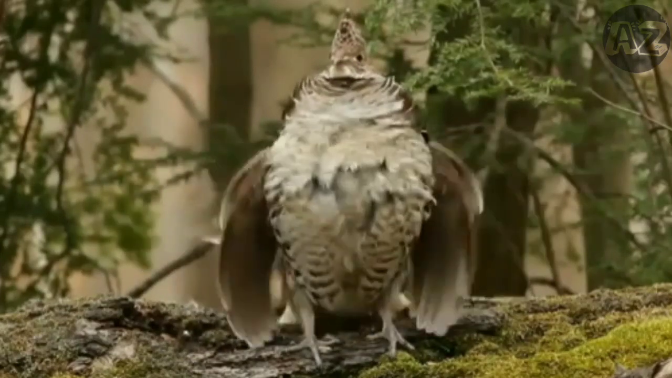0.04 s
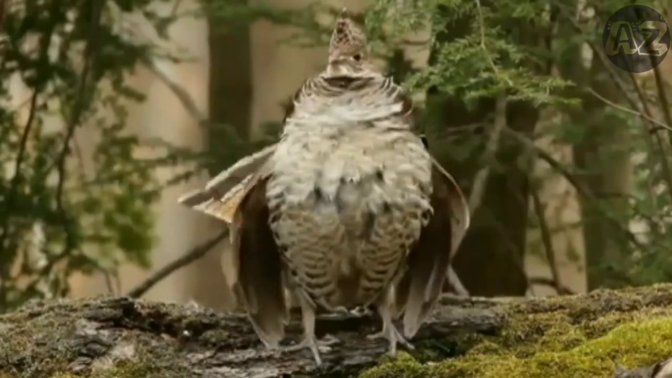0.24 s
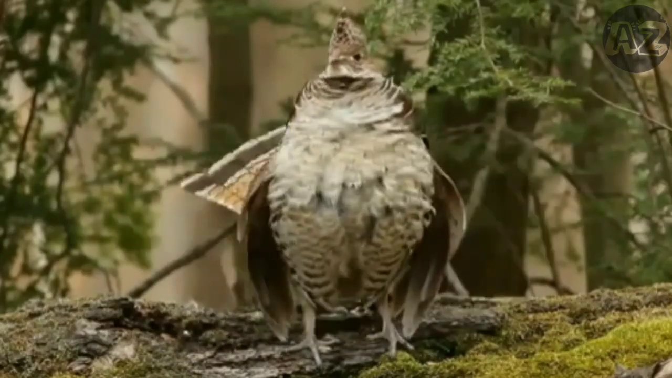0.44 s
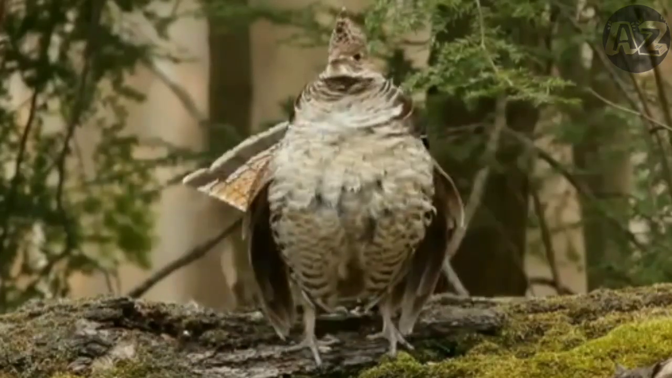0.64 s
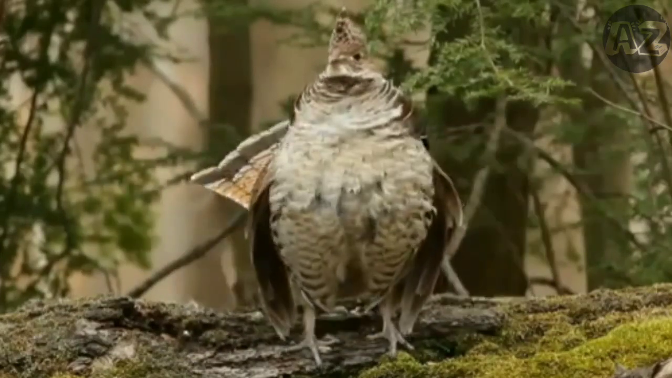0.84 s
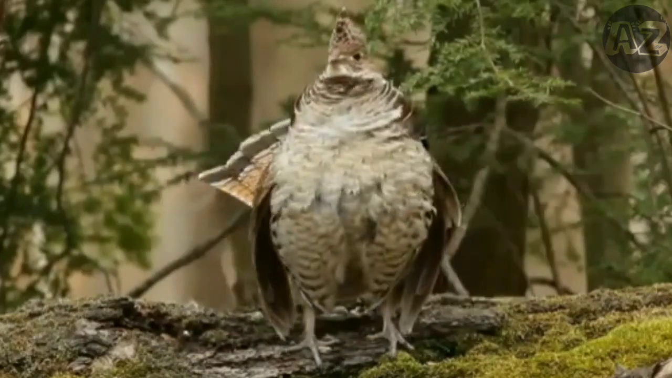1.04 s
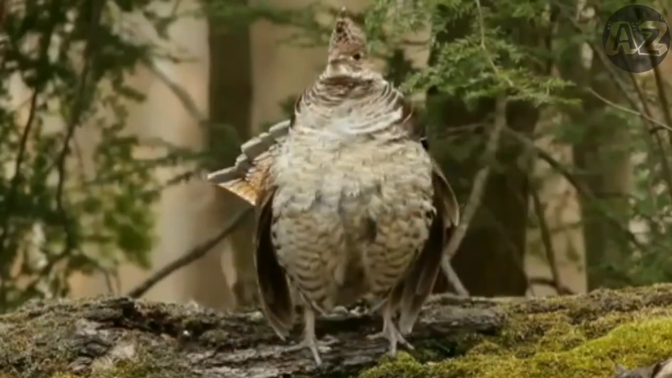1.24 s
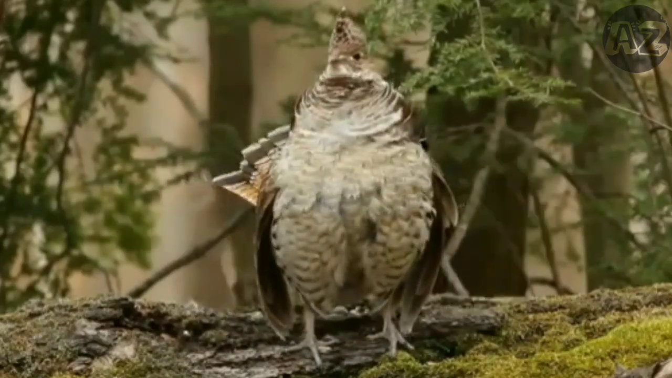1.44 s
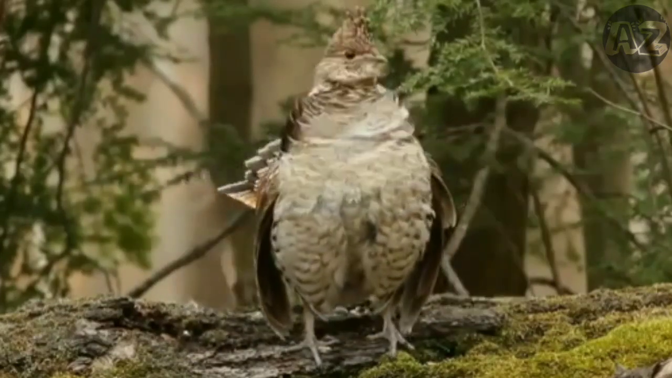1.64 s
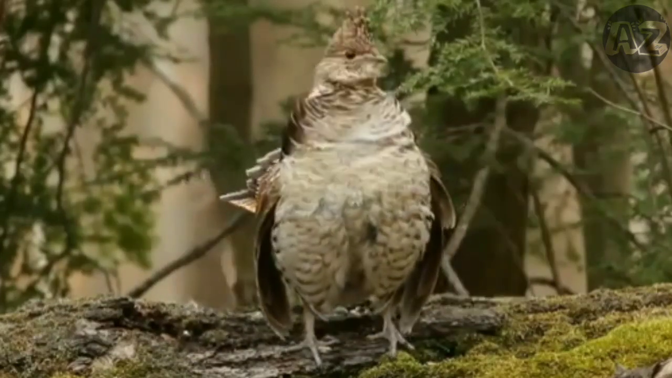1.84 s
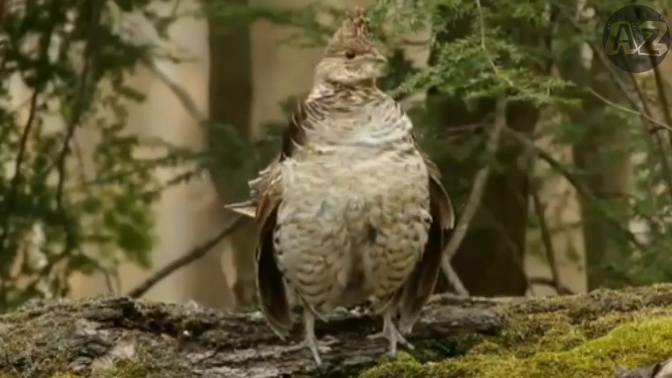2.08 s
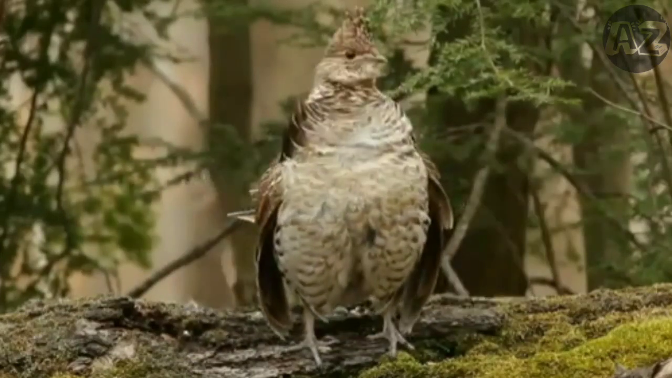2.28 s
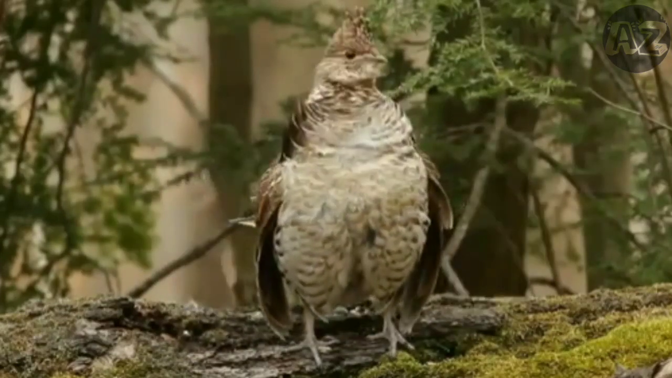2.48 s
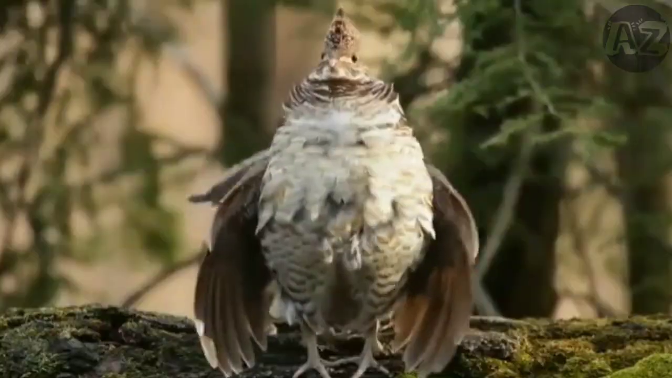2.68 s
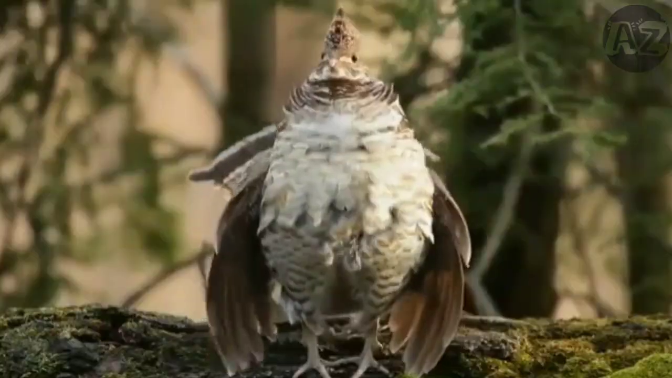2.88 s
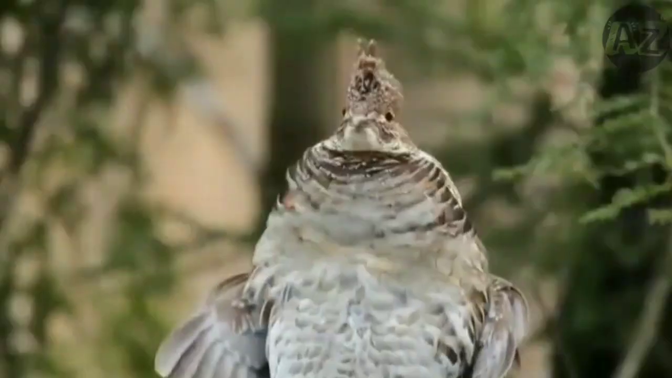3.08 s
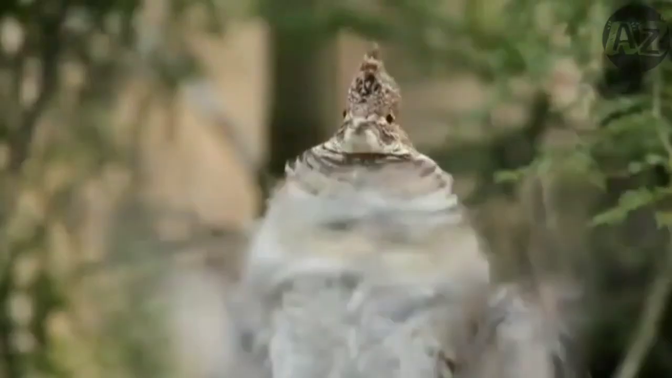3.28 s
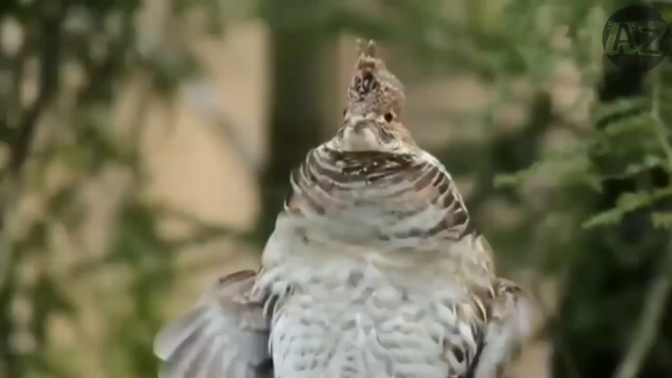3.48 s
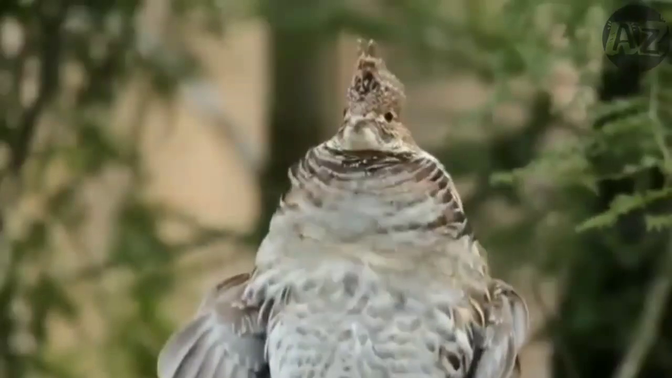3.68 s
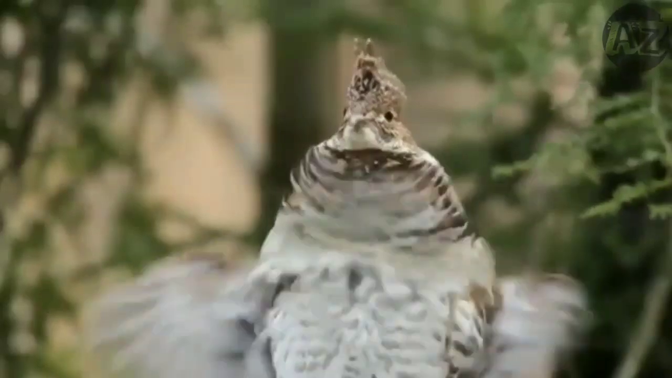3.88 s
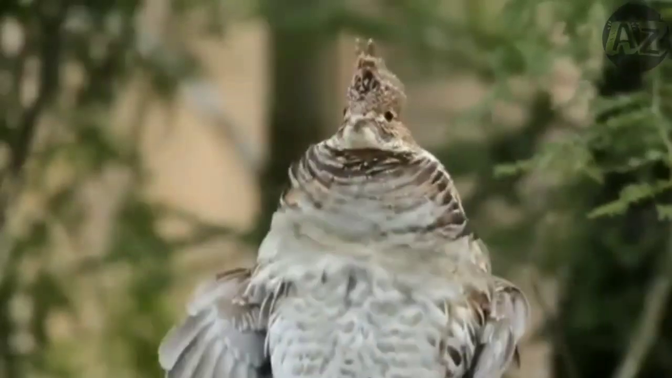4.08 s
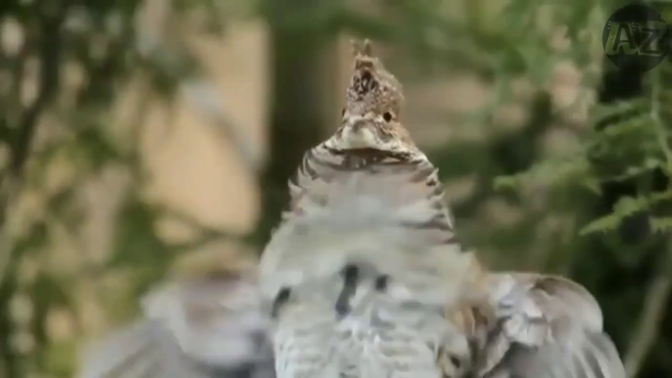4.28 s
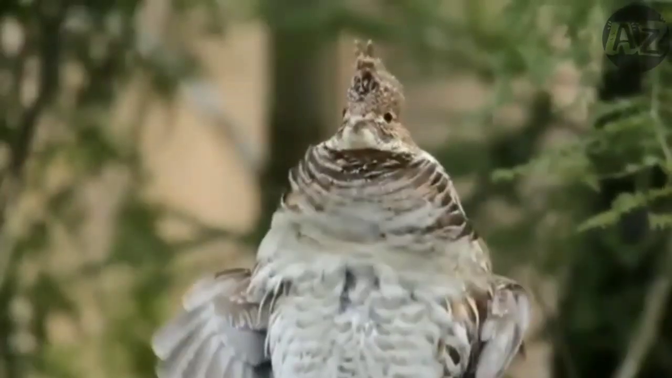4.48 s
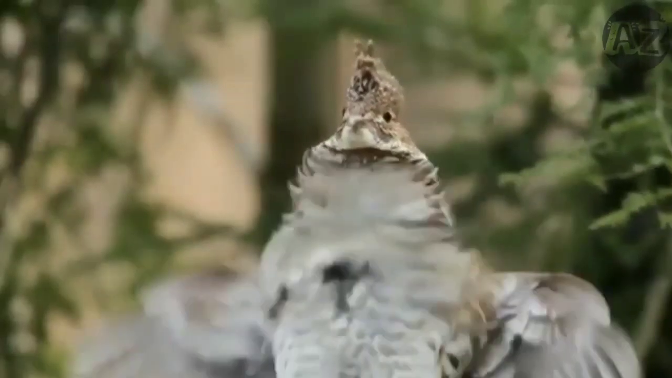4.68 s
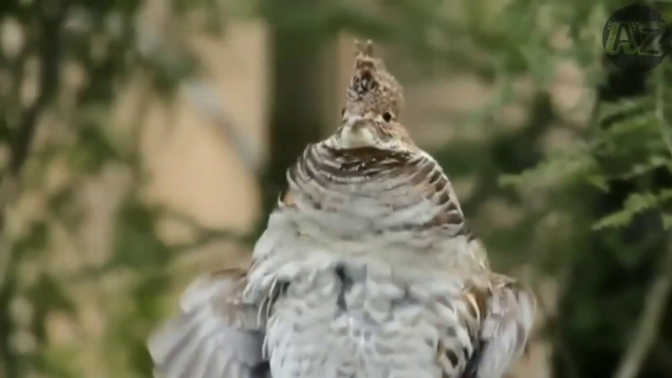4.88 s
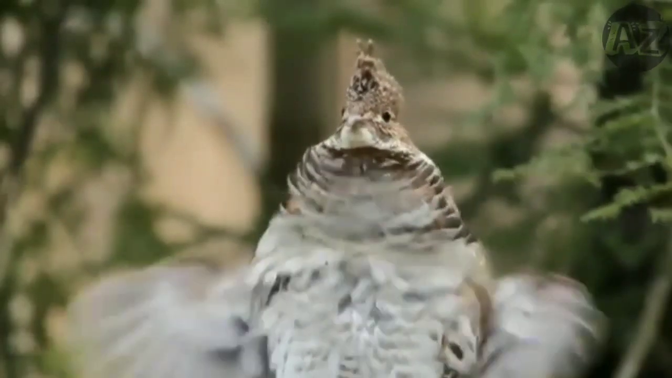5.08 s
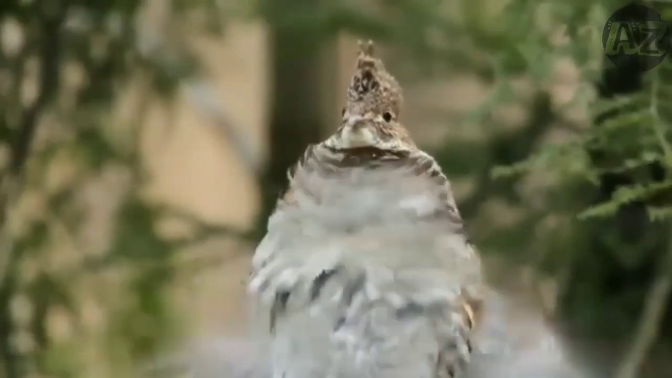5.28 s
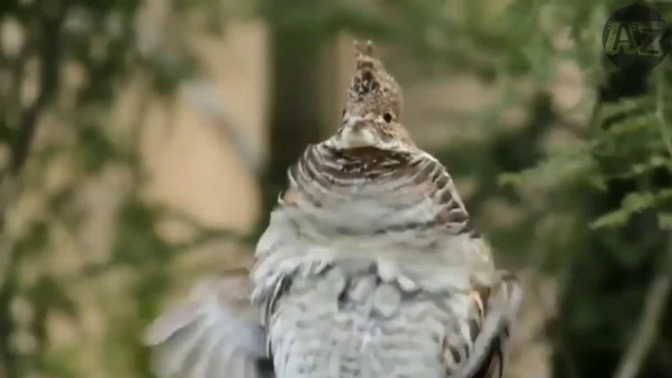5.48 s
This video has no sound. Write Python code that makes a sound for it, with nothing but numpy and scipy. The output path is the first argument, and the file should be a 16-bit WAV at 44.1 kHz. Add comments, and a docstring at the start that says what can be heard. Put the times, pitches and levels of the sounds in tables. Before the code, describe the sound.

Close stereo microphones in a damp forest. One very deep wing thump opens, then over three seconds of quiet: rapid high insect chirps, soft drips, leaf ticks and a thin far bird whistle. A rumbling gust arrives just before three seconds, with a faint burry bird note. Then six heavy thumps follow, closer and closer, overloading slightly and rolling away among the trees.

```python
"""A ruffed grouse starts to drum on a log, close to a pair of microphones in a damp forest. Each wing stroke is
one deep pressure pulse that rolls away among the trees; loud peaks overload the recorder. An insect chirps very
high in runs of falling whistles, and fainter insects shimmer behind it. Water drips on leaves and litter as
short noise bursts; a far bird's two calls are noise rung at a pitch. Shaped noise makes the forest hush, the
soft rumble of moving air and a wide hiss that swells and then drops away."""
import sys
import numpy as np
from scipy import signal
from scipy.fft import rfft, irfft, next_fast_len
from scipy.io import wavfile
from scipy.ndimage import uniform_filter1d

SR = 44100
rng = np.random.default_rng(int(sys.argv[2]) if len(sys.argv) > 2 else 0)


def pcm_store(signal):
    """Save signal as 16-bit PCM."""
    levels = np.round(np.clip(np.atleast_2d(signal), -1, 1) * 32767)
    wavfile.write(sys.argv[1], SR, levels.astype(np.int16).T)


N = 243873
TIME = np.arange(N) / SR

# wing strokes: (time [s], pulse peak [dB], build-up width [s], opening flick relative to the pulse [dB])
WING_STROKES = [(0.0853, -0.5, .005, -40), (3.4389, 3.4, .0101, -8.5), (3.9532, 3.7, .0058, -27),
                (4.4048, 3.6, .0057, -21), (4.8064, 3.4, .0056, -21), (5.1755, 3.6, .0056, -20),
                (5.5128, 3.6, .0053, -27)]
# the loudest drips on the litter: (time [s], peak before the shared drip level is added [dB], pitch [Hz])
LITTER_DRIPS = [(0.404, -32, 1110), (0.466, -34.5, 907), (0.925, -31.5, 1690), (1.02, -34, 1570),
                (1.156, -31, 1460), (1.316, -33.5, 410), (1.682, -30.5, 474), (1.777, -32.5, 2670),
                (1.99, -32.5, 370), (2.317, -32.5, 1160), (2.388, -29.5, 1170), (2.488, -30.5, 482),
                (2.598, -33, 365), (3.731, -30.5, 2340), (4.547, -31, 1510), (4.638, -31, 1530),
                (5.145, -31, 1850), (5.34, -30, 1100)]
# the sharpest ticks of droplets on near leaves: (time [s], peak [dB], centre pitch [Hz])
LEAF_TICKS = [(0.181, -28.5, 9000), (0.68, -32, 7500), (0.776, -26, 6530), (0.997, -27.5, 5260),
              (1.32, -24.5, 7100), (1.553, -27, 8500), (2.358, -33, 5000), (3.173, -22.5, 7600),
              (3.453, -24, 8900), (3.571, -25, 6300), (4.583, -28, 7530), (5.032, -28, 8000),
              (5.381, -29.5, 6230)]
# far bird: (start [s], end [s], pitch [Hz], half the width of each filter [Hz], level at full swell [dB])
BIRD_CALLS = [(0.077, 0.62, 2630, 20, -53.5), (0.089, 0.6, 3600, 30, -61), (2.68, 3.51, 2724, 160, -49)]
# air moving over the microphones, a lull and then a gust: (time [s], level [dB])
BREEZE_LEVEL = [(0, -25), (.2, -30.5), (.7, -35), (1.5, -44.5), (2.1, -52.5), (2.66, -50), (2.85, -18.5),
                (3.05, -24), (3.3, -19), (3.5, -31), (5.53, -31)]
# a wide soft hiss that grows and then drops away at 3.5 s: (time [s], level [dB])
WIDE_HISS_LEVEL = [(0, -62), (1.4, -58.5), (2.6, -56.5), (2.85, -52.5), (3.38, -50), (3.52, -61)]
# tone balance of the moving air: (frequency [Hz], relative level per Hz [dB])
BREEZE_SPECTRUM = [(12, 3.5), (20, 1.5), (32, -18), (45, -24.5), (65, -17.5), (100, -28), (160, -41.5),
                   (300, -55.5), (1000, -76.5)]
# tone balance of the wide hiss: (frequency [Hz], relative level per Hz [dB])
WIDE_HISS_SPECTRUM = [(100, 10), (400, 4), (1000, 3.5), (2000, -7), (4000, -32), (12000, -24)]
# tone balance of the forest hush: (frequency [Hz], relative level per Hz [dB])
FOREST_SPECTRUM = [(30, 4), (100, 6.5), (240, -11.5), (450, -7.5), (700, -8), (950, -6.5), (2300, -7.5),
                   (3700, -12), (4700, -17), (5300, -10), (7200, -8.5), (10000, -13.5), (15500, -31)]
# how alike left and right are in the forest hush: (frequency [Hz], likeness [-1 to 1])
FOREST_ALIKE = [(30, 0.27), (200, 0.49), (500, 1), (2000, 0.97), (5000, 1), (15000, 1)]
# balance of the far drops' bands: (frequency [Hz], relative level of the band [dB])
PATTER_BALANCE = [(300, -3), (450, 0.5), (680, -11), (880, 0), (1600, -3), (2600, 0), (3600, -6.5),
                  (4700, 2), (5500, -1.5), (7200, 5.5), (10000, -0.5), (14000, -11.5)]
# tone balance of the trees' echo: (frequency [Hz], relative level per Hz [dB])
ECHO_SPECTRUM = [(12, 16.5), (25, 3), (38, -2), (55, -9), (85, -5.5), (110, 4), (160, -38), (300, -22),
                 (1000, -28)]
# the insect's pace, slower by the end: (time [s], time from chirp to chirp [s])
CHIRP_PACE = [(0, .1524), (.7, .1496), (1, .152), (3.25, .1529), (3.5, .1592), (4.4, .1543), (4.6, .166)]

# a harder stroke is a quicker one: pitch at 0 dB, its rise with strength, and the width of its fall
STROKE_HZ, STROKE_HZ_PER_DB, STROKE_FALL_S = 53.6, 1.15, .0084
FLICK_LEAD_S, FLICK_WIDTH_S = .0175, .002
RIGHT_LEAD_S, RIGHT_DB = .0005, -.4
BOOM_HZ, BOOM_WIDTH_HZ, BOOM_DB = 40, 23, -13
# the song starts just before the sound does; each chirp fills this share of its period
SONG_START_S, SONG_END_S, CHIRP_SHARE = -.07, 5.3, .745
# softer drips: peak before the shared drip level is added, and range of pitch
SOFT_DRIP_DB, SOFT_DRIP_LOW_HZ, SOFT_DRIP_HIGH_HZ = -38, 365, 1940
CUTOFF_HZ = 15600


def from_db(db):
    """Turn decibels into a gain."""
    return 10 ** (np.asarray(db) / 20)


def rms_one(x):
    """Scale to an average (rms) level of 1."""
    return x / np.sqrt(np.mean(x ** 2) + 1e-20)


def at_hz(points, hz):
    """Read a table between its points, with frequency on a log scale."""
    points = np.array(points)
    return np.interp(np.log(np.maximum(hz, 1)), np.log(points[:, 0]), points[:, 1])


def band(x, low_hz, high_hz):
    """Keep the sound between two frequencies, with gentle edges."""
    edges_hz = [low_hz, min(high_hz, SR / 2 - 1000)]
    sos = signal.butter(2, edges_hz, "band", fs=SR, output="sos")
    return signal.sosfilt(sos, x + 1e-18)


def resonate(x, hz, width_hz):
    """Ring at one pitch, as a hollow body does, with gain 1 at the top."""
    r = np.exp(-np.pi * width_hz / SR)
    feed = np.array([1, 0, -1]) * (1 - r * r) / 2
    ring = [1, -2 * r * np.cos(2 * np.pi * hz / SR), r * r]
    return signal.lfilter(feed, ring, x + 1e-18)


def drift(rate):
    """Wander by chance between random points, this many per second, drawn with spread 1."""
    knots = rng.standard_normal(2000)
    return np.interp(TIME * rate, np.arange(len(knots)), knots)


def stereo_noise(colour, likeness):
    """Two channels of shaped noise, as alike as asked at each frequency; rms 1."""
    size = next_fast_len(N)
    hz = np.arange(size // 2 + 1) * SR / size
    white = rfft(rng.standard_normal((2, size)))
    mid, side = white * from_db(at_hz(colour, hz)) * (hz > 10)
    alike = np.clip(at_hz(likeness, hz), -1, 1)
    # the middle part is the same on both sides, the side part is opposite
    spectrum = np.sqrt(1 + alike) * mid + np.sqrt(1 - alike) * side * [[1], [-1]]
    return rms_one(irfft(spectrum, size)[:, :N])


def level_over_time(points):
    """Gain at every moment from a table of times and decibels."""
    return from_db(np.interp(TIME, *np.transpose(points)))


def add(track, sound, start_s):
    """Mix a short sound into a track."""
    at = int(round(start_s * SR))
    low, high = max(at, 0), min(at + len(sound), N)
    if high > low:
        track[low:high] += sound[low - at:high - at]


def forest_hush(level_db=-49.5, waver_db=0.4):
    """The steady hush of the forest: shaped noise whose level wavers slightly."""
    return from_db(level_db + waver_db * drift(9)) * stereo_noise(FOREST_SPECTRUM, FOREST_ALIKE)


def breeze():
    """Air moving over the microphones: mostly low noise that follows the lull and the gust."""
    return level_over_time(BREEZE_LEVEL) * stereo_noise(BREEZE_SPECTRUM, [(20, 0.22), (200, 0.52)])


def wide_hiss():
    """A wide soft hiss: noise almost unrelated on the two sides, growing and then dropping away at 3.5 s."""
    return level_over_time(WIDE_HISS_LEVEL) * stereo_noise(WIDE_HISS_SPECTRUM, [(100, 0.012), (15000, 0.026)])


def chirps():
    """Start and length of each chirp: one follows another and fills a set share of its period."""
    rows, start_s = [], SONG_START_S
    while start_s < SONG_END_S:
        period_s = np.interp(start_s, *np.transpose(CHIRP_PACE))
        rows.append((start_s, CHIRP_SHARE * period_s))
        start_s += period_s
    return rows


def insect(level_db=-31.0, centre_hz=8400, glide_hz=2600, soft_start_db=-5, swell_s=0.04,
           sharp_start_hz=200, short_sweep_share=0.31, uneven_db=0.67, wing_hz=8520,
           wing_width_hz=2200, notch_hz=8550, notch_width_hz=110, scatter_db=-11):
    """Each wing closure is a short falling whistle; a chirp is about thirteen, swelling and settling in pitch."""
    pulse_hz = 116.4  # wing closures per second
    out, t = np.zeros(N), TIME[:int(SR / pulse_hz)]
    closure = t * pulse_hz - .45
    shape = np.exp(-(np.abs(closure) / 0.25) ** 2.18)
    for start_s, length_s in chirps():
        chance = rng.standard_normal((20, 3))
        unsteady_s = 3e-5 * np.cumsum(chance[:, 2])
        for k in range(min(round(length_s * pulse_hz), 20)):
            age = k / pulse_hz
            # the first closures are gentle: quieter, higher and with a shorter sweep
            gentle = np.exp(-(age / swell_s) ** 2)
            middle_hz = centre_hz + sharp_start_hz * gentle + 70 * chance[k, 0]
            hz = middle_hz - glide_hz * (1 - short_sweep_share * gentle) * closure
            db = level_db + soft_start_db * gentle + uneven_db * chance[k, 1]
            whistle = shape * np.sin(2 * np.pi * np.cumsum(hz) / SR)
            add(out, from_db(db) * whistle, start_s + age + unsteady_s[k])
    # foliage scatters the song into a short noisy tail
    t = TIME[:SR // 10]
    foliage = rng.standard_normal(len(t)) * np.exp(-t / 0.022)
    foliage = foliage / np.linalg.norm(foliage)
    out = out + from_db(scatter_db) * signal.fftconvolve(out, foliage)[:N]
    # the wings favour the middle of the sweep, with a narrow dip in it
    out = resonate(out, wing_hz, wing_width_hz)
    return out - resonate(out, notch_hz, notch_width_hz)


def far_insects(level_db=-62, hz=4680, width_hz=420, throb_db=5.0):
    """A faint, uneven shimmer of insects deep in the wood: noise rung twice at one pitch."""
    shimmer = resonate(resonate(rng.standard_normal(N), hz, width_hz), hz, width_hz)
    return from_db(level_db + throb_db * drift(70)) * rms_one(shimmer)


def drop_impacts(per_s, size_db):
    """Energies of drops of random size that land at random moments."""
    sizes = from_db(size_db * np.minimum(rng.exponential(1, N), 3.3))
    return sizes ** 2 * (rng.random(N) < per_s / SR)


def patter(level_db=-61, per_s=24, size_db=3.5, low_decay_s=0.0064, shared=0.32, count=26):
    """Many farther drops: each excites its own band, some spread over all, and high ones die sooner."""
    out, broad = np.zeros(N), drop_impacts(per_s, size_db)
    for hz in np.geomspace(370, 14000, count):
        keep = np.exp(-2 / (SR * low_decay_s * (hz / 370) ** -.3))
        hits = drop_impacts(per_s, size_db) + shared * broad
        # soft leaves give way, so each impact swells before it dies
        energy = signal.lfilter([1], [1, -2 * keep, keep ** 2], hits + 1e-18)
        grains = band(np.sqrt(np.abs(energy)) * rng.standard_normal(N), hz / 1.127, hz * 1.115)
        out += from_db(level_db + at_hz(PATTER_BALANCE, hz)) * rms_one(grains)
    return out


def far_bird():
    """A thin two-toned whistle, later a burry note; both reach the two sides by many paths."""
    out = np.zeros((2, N))
    for start_s, end_s, hz, width_hz, db in BIRD_CALLS:
        progress = np.clip((TIME - start_s) / (end_s - start_s), 0, 1)
        swell = np.sqrt(np.sin(np.pi * progress))
        # one noise shared by both sides, plus one for each side
        paths = rng.standard_normal(N) + rng.standard_normal((2, N))
        note = resonate(resonate(paths, hz, 2 * width_hz), hz, 2 * width_hz)
        out += from_db(db) * swell * rms_one(note)
    return out


def wing_pressure():
    """A small flick as the wings open, then one push-pull-push of air."""
    out, t = np.zeros(N), np.arange(-SR // 20, SR // 20) / SR
    for s, db, build_s, flick_db in WING_STROKES:
        hz = STROKE_HZ + STROKE_HZ_PER_DB * db
        width_s = np.where(t < 0, build_s, STROKE_FALL_S)
        stroke = -np.cos(2 * np.pi * hz * t) * np.exp(-.5 * (t / width_s) ** 2)
        flick = from_db(flick_db) * np.exp(-.5 * ((t + FLICK_LEAD_S) / FLICK_WIDTH_S) ** 2)
        add(out, from_db(db) * (stroke + flick), s + t[0])
    return out


def low_pulses(pulse_db=-28, pulse_hz=218, delay_s=0.0035, width_s=0.0041):
    """A short low pulse near 218 Hz, added just after each loud stroke."""
    out, t = np.zeros(N), np.arange(-SR // 50, SR // 50) / SR
    pulse = -np.cos(2 * np.pi * pulse_hz * t) * np.exp(-.5 * (t / width_s) ** 2)
    for s, db, *_ in WING_STROKES:
        if db > 0:
            add(out, from_db(pulse_db) * pulse, s + delay_s + t[0])
    return out


def stroke_loudness(pressure):
    """How strong the wing pressure is at each moment, smoothed over 400 samples."""
    return np.sqrt(uniform_filter1d(pressure ** 2, size=400).clip(0))


def feather_rush(pressure, flutter_db=-35, slap_db=-39):
    """Air rushing through the feathers: noise that grows and fades with the wing pressure."""
    # a low flutter, opposite and weaker on the right
    flutter = from_db(flutter_db) * rms_one(band(rng.standard_normal(N), 290, 417)) * np.array([[1], [-.3]])
    # a slap that reaches higher
    slap = from_db(slap_db) * rms_one(band(rng.standard_normal((2, N)), 280, 646))
    return stroke_loudness(pressure) * (flutter + slap)


def stroke_hiss(pressure, hiss_db=-40):
    """A faint wide broadband hiss that follows the loudness of each stroke."""
    hiss_colour = [(100, -38), (400, -31), (1000, 2.5), (3000, -1), (12000, -8)]
    hiss = stereo_noise(hiss_colour, [(20, -0.34), (15000, -0.54)])
    return stroke_loudness(pressure) * from_db(hiss_db) * hiss


def tree_echo(pressure, echo_db=-21, echo_t60=0.9):
    """The trees return each pulse as a blurred roll that fades by 60 dB in echo_t60 seconds."""
    t = TIME[:SR]
    fade = from_db(-60 * t / echo_t60) * (1 - np.exp(-t / 0.014))
    trunks = stereo_noise(ECHO_SPECTRUM, [(20, 0.3), (100, 0.1)])[:, :SR] * fade
    echo = signal.fftconvolve(pressure[None], trunks, axes=1)[:, :N]
    # the echo level is relative to the pressure
    return from_db(echo_db) * np.std(pressure) * rms_one(echo)


def grouse():
    """The two microphones meet the wing pulse in opposite polarity; boom, feathers, hiss and echo join it."""
    pressure = wing_pressure()
    right = -from_db(RIGHT_DB) * np.interp(TIME + RIGHT_LEAD_S, TIME, pressure)
    near = np.array([pressure, right])
    # a short hollow boom, alike on both sides, follows each stroke
    boom = from_db(BOOM_DB) * resonate(pressure, BOOM_HZ, BOOM_WIDTH_HZ)
    noise = feather_rush(pressure) + stroke_hiss(pressure)
    return near + boom + low_pulses() + noise + tree_echo(pressure)


def soft_drips(count=16):
    """Time, level and pitch of softer drips: one at a random moment in each equal slice of time."""
    when, pitch = rng.random((count, 2)).T
    times = (np.arange(count) + when) / count * N / SR
    pitches = SOFT_DRIP_LOW_HZ * (SOFT_DRIP_HIGH_HZ / SOFT_DRIP_LOW_HZ) ** pitch
    return [(s, SOFT_DRIP_DB, hz) for s, hz in zip(times, pitches)]


def drips(drip_db=-2, splash_db=-9, rise_s=0.00096, decay_s=0.0086, width_share=0.22):
    """A drop on soft litter: a short damped rustle round one pitch, with a little wider splash."""
    out, t = np.zeros(N), TIME[:SR // 10]
    contact = (1 - np.exp(-t / rise_s)) * np.exp(-t / decay_s)
    for s, db, hz in list(LITTER_DRIPS) + soft_drips():
        body, spray = rng.standard_normal((2, len(t))) * contact
        rustle = rms_one(resonate(body, hz, hz * width_share))
        splash = from_db(splash_db) * rms_one(band(spray, 290, 2360))
        drop = rustle + splash
        add(out, from_db(db + drip_db) * drop / np.abs(drop).max(), s)
    return out


def ticks(decay_s=0.0015, spread=1.48):
    """A droplet on a near leaf: a bright snap of a few milliseconds round the leaf's own pitch."""
    out, t = np.zeros(N), TIME[:SR // 20]
    for s, db, hz in LEAF_TICKS:
        burst = rng.standard_normal(len(t)) * np.exp(-t / decay_s)
        snap = band(burst, hz / spread, hz * spread)
        add(out, from_db(db) * snap / np.abs(snap).max(), s)
    return out


def scene():
    """The grouse in front of the dripping forest."""
    air = forest_hush() + breeze() + wide_hiss()
    animals = insect() + far_insects() + far_bird() + grouse()
    water = patter() + drips() + ticks()
    return air + animals + water


def record(dry, top=1.0):
    """The recorder flattens peaks that are too loud; then the top of the spectrum is cut."""
    clipped = np.clip(dry, -top, top)
    sos = signal.ellip(10, .1, 70, CUTOFF_HZ, fs=SR, output="sos")
    return signal.sosfilt(sos, clipped)


dry = scene()
out = record(dry)
pcm_store(out)
```